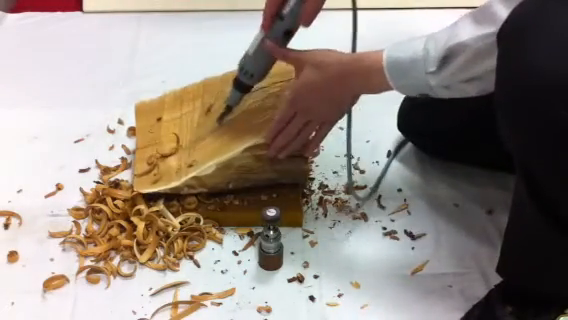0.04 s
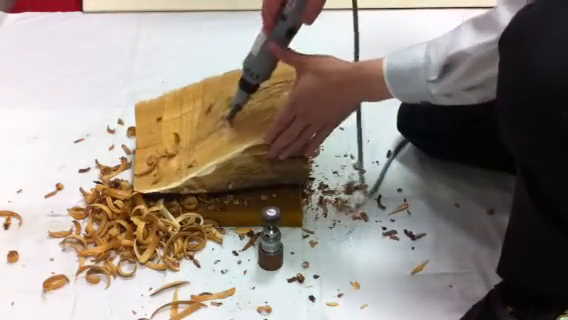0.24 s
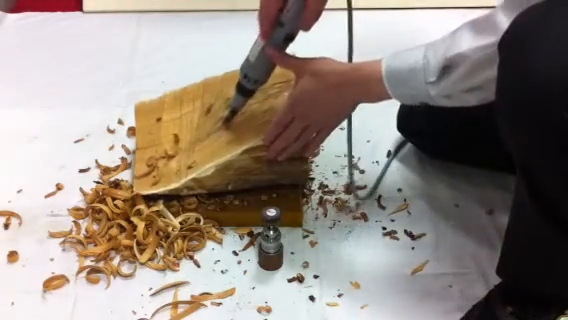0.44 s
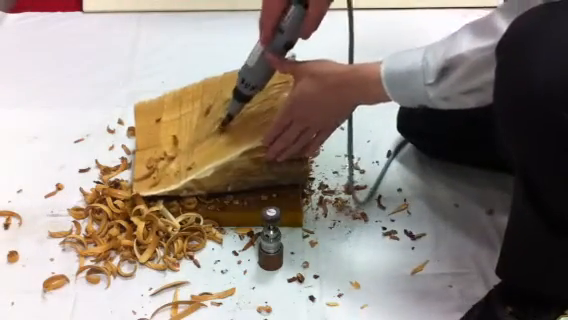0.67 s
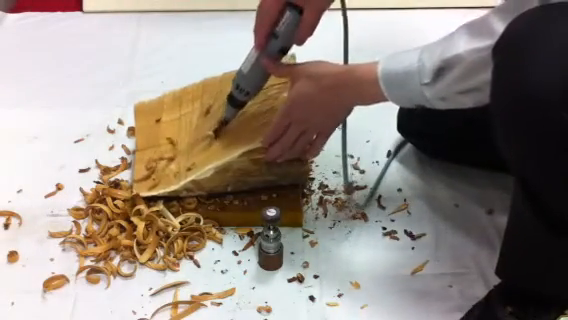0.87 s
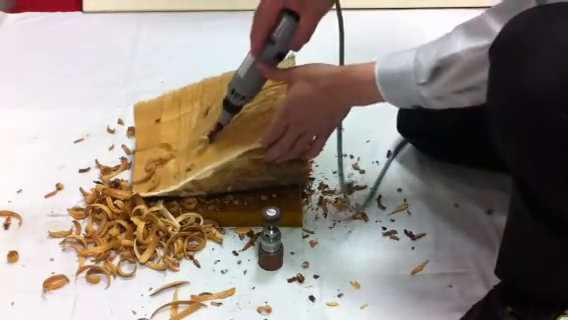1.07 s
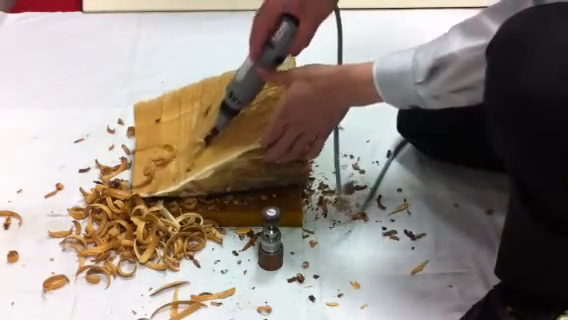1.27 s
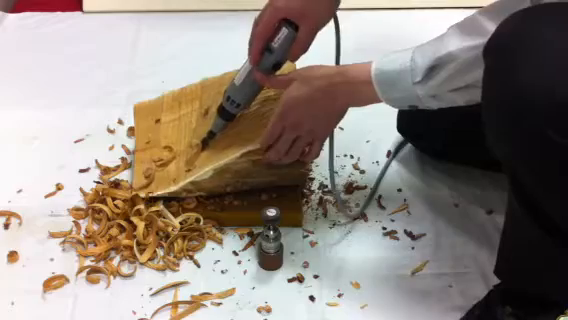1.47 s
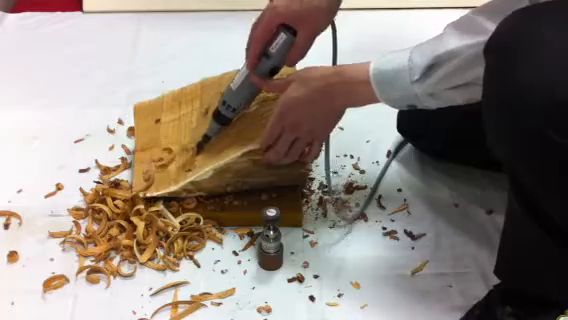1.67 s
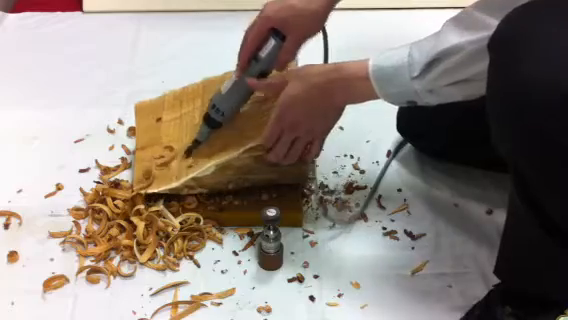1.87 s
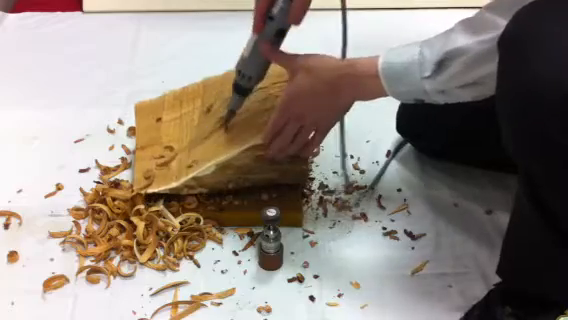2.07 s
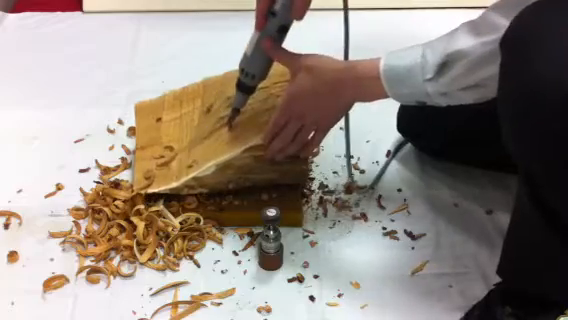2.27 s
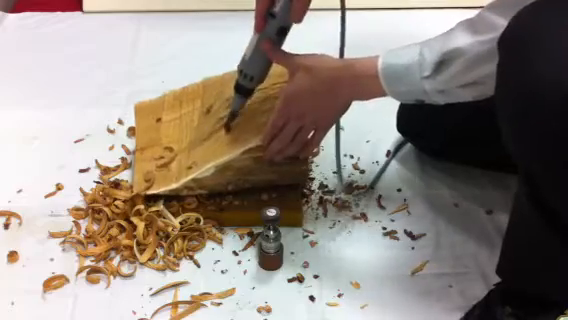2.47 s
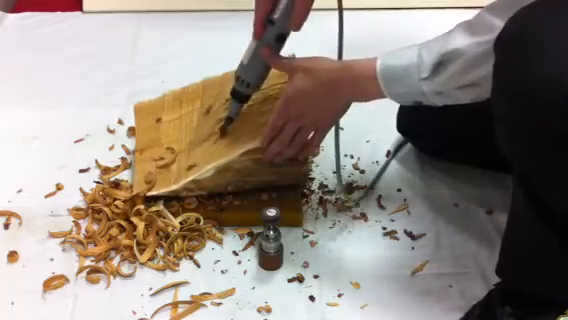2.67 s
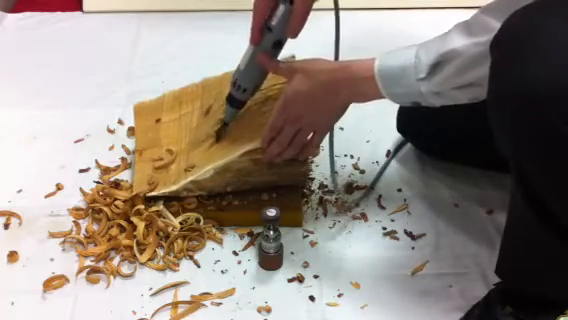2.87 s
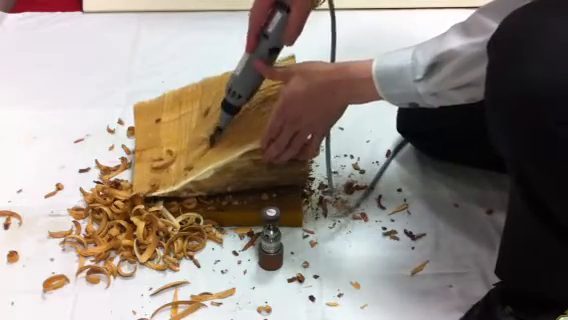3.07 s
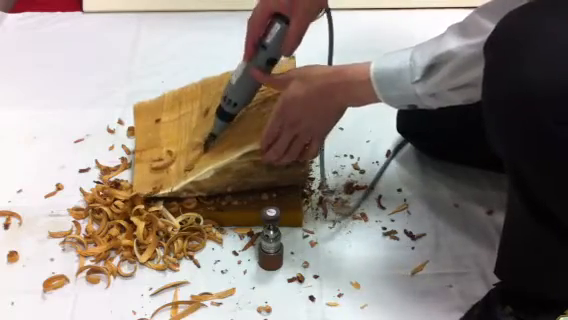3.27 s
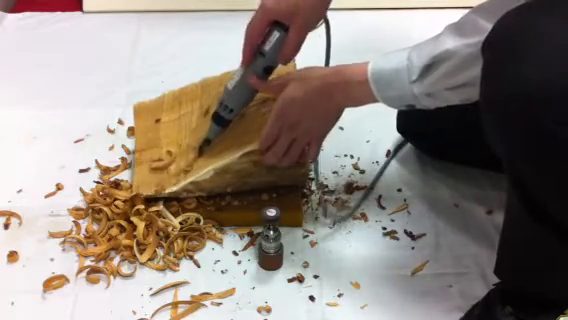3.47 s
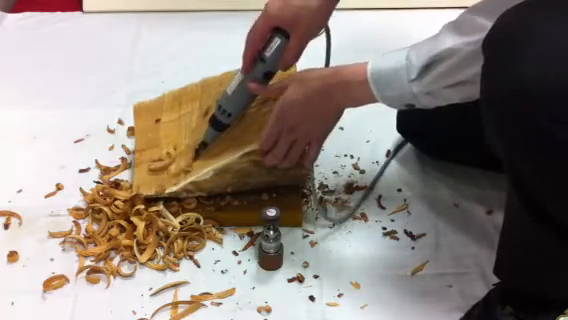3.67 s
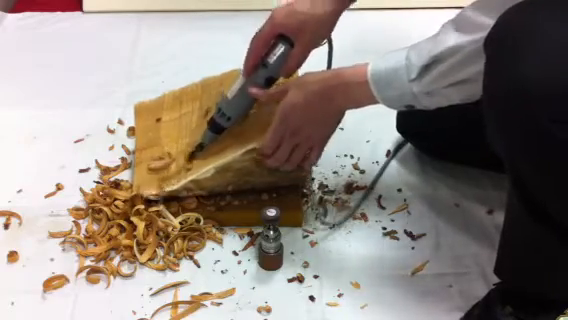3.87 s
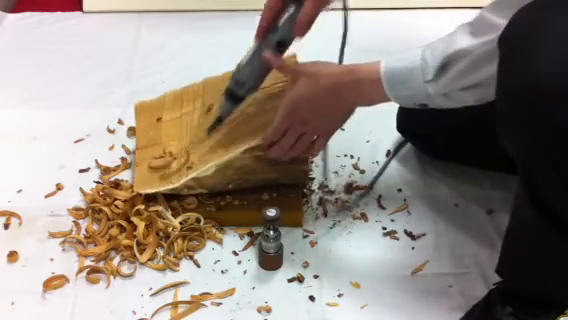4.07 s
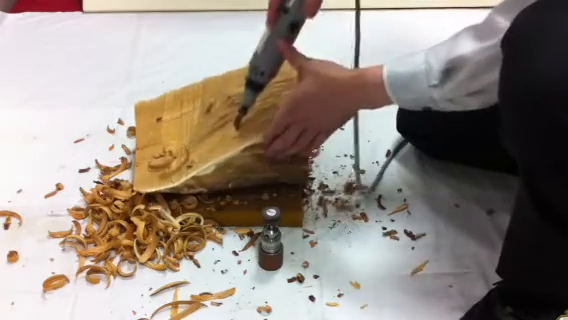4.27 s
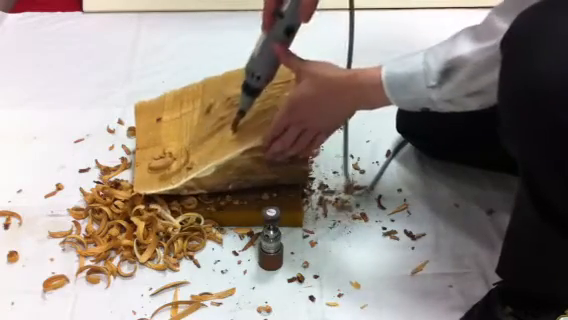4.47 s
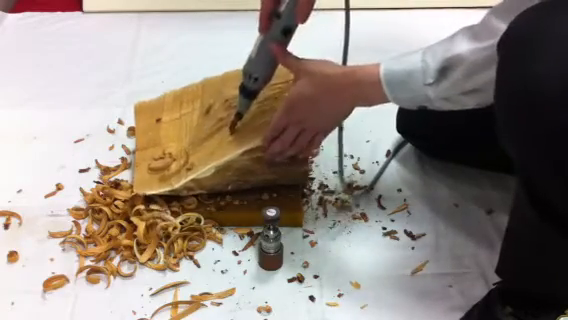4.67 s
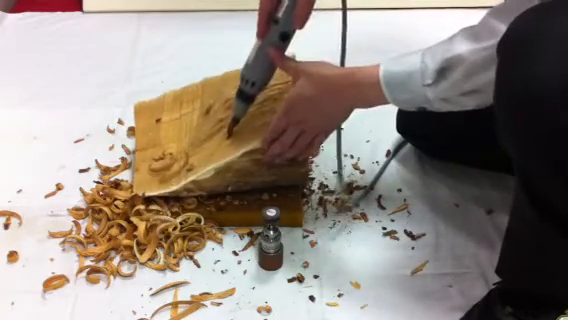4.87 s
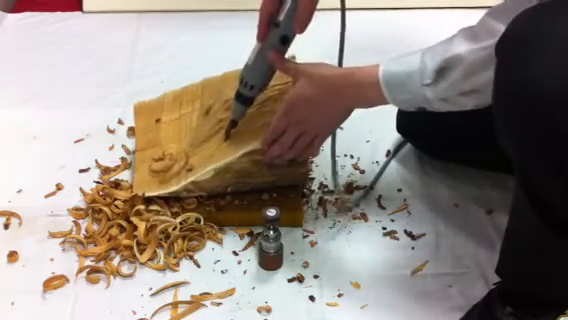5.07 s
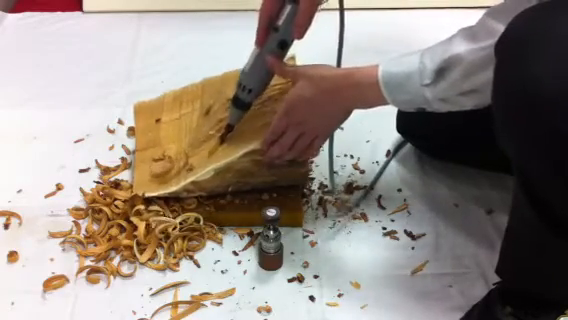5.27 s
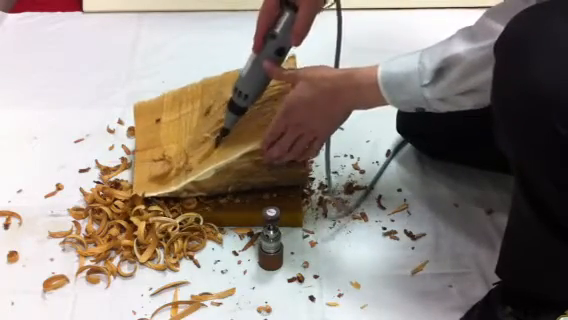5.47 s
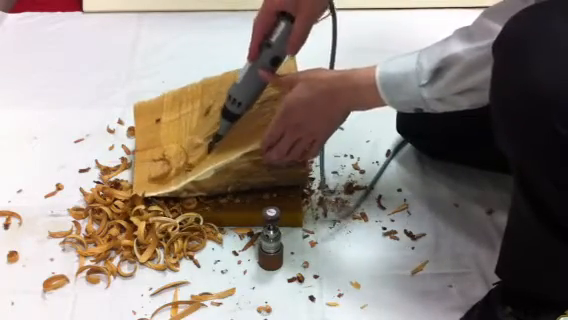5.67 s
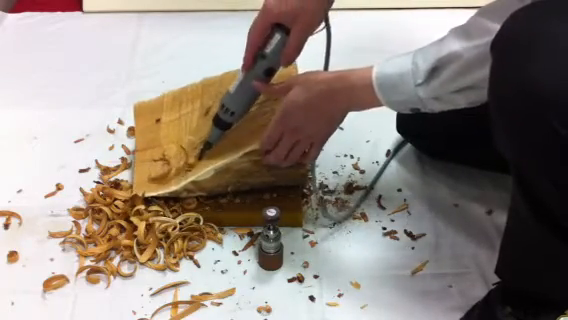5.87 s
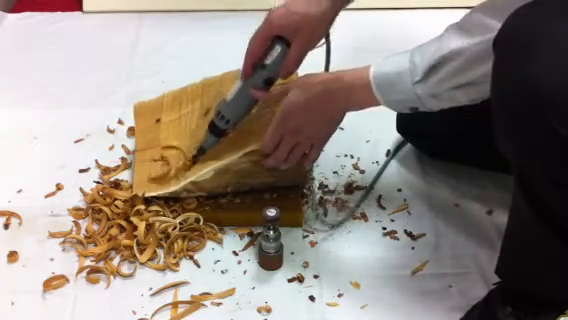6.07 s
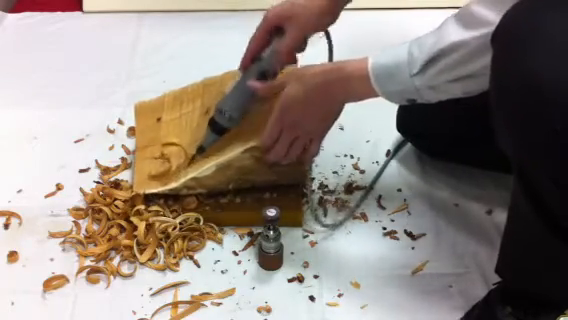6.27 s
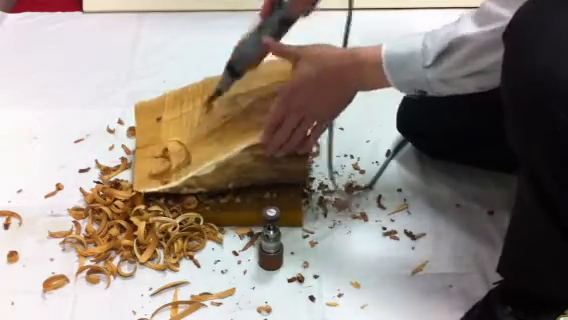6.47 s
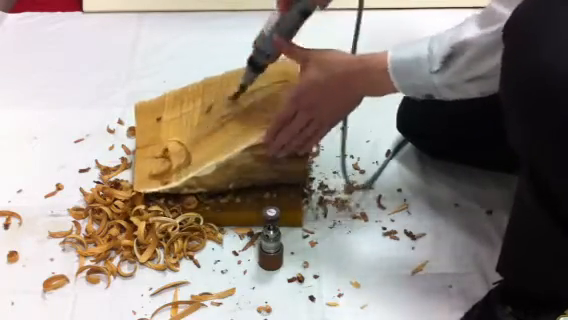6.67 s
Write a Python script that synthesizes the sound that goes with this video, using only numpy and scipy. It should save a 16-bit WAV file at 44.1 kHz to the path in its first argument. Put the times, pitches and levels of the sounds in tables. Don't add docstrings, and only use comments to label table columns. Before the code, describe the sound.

An electric carving tool whines quietly, then buzzes harshly through three long cuts in a wood block, with short free-running pauses between strokes.

```python
import sys
import numpy as np
from scipy import signal
from scipy.fft import rfft, irfft, next_fast_len
from scipy.io import wavfile
from scipy.ndimage import uniform_filter1d, map_coordinates

SR = 44100
rng = np.random.default_rng(int(sys.argv[2]) if len(sys.argv) > 2 else 0)


def invert_db(x):
    u = np.asarray(x, float) / 20
    return 10 ** u


def transcribe(u):
    v = np.clip(np.atleast_2d(u).T, -1, 1)
    q = np.round(v * 32767).astype(np.int16)
    wavfile.write(sys.argv[1], SR, q)


N = 296352
ROCKING, BLOCK_PART, BLADE_PART, SHANK_PART, RATTLE_PART = 1, 2, 3, 4, 5


def clock():
    return np.arange(N) / SR


def unit(x):
    return x / np.sqrt(np.mean(x ** 2) + 1e-20)


def along(points, hz):
    f, v = np.transpose(points)
    return np.interp(np.log(hz + 1), np.log(f + 1), v)


def curve(rows, column=1):
    rows = np.array(rows)
    return np.interp(clock(), rows[:, 0], rows[:, column])


def wobble(rate):
    knots = rng.standard_normal(int(N * rate / SR) + 4)
    return map_coordinates(knots, [np.arange(N) * rate / SR])


def filtered(x, response):
    m = next_fast_len(N + SR // 2)
    return irfft(rfft(x, m) * response(np.fft.rfftfreq(m, 1 / SR)), m)[:N]


def modes(table):
    def response(f):
        total = 0
        for k, (centre, width, db) in enumerate(table):
            total = total + (-1) ** k * invert_db(db) * 1j * f * width / (centre ** 2 - f ** 2 + 1j * f * width)
        return total
    return response


def shaped(table):
    return lambda hz: invert_db(along(table, hz))


def rung(drive, response, gain):
    steady = rfft(drive) * response(np.fft.rfftfreq(N, 1 / SR))
    return filtered(drive * gain, response) * N / np.linalg.norm(steady) / np.sqrt(2)


# time in seconds, turns a second in Hz.
LOADED_SPEED = [
    [(0.0, 172.3)],
    [(0.42, 176.4), (0.5, 172.9), (0.76, 163.4), (0.92, 157.8), (1.05, 155.3), (1.62, 156.8), (1.8, 159.4),
     (1.92, 166.6), (2.0, 173.5)],
    [(2.45, 175.1), (2.53, 172.6), (2.68, 162.9), (2.84, 154), (3.02, 158.5), (3.45, 154.9), (3.75, 157.8),
     (4.02, 164.8), (4.12, 176.5)],
    [(4.52, 176.9), (4.72, 169.3), (4.87, 159.4), (5.05, 154.5), (5.42, 152.4), (5.65, 158.7),
     (5.95, 163.2), (6.18, 159), (6.46, 171.9)],
]
FREE_HZ = [176.8, 177.2, 176.7, 173.4]
RUN_UP_S = .09


def speed():
    rows = []
    for k, loaded in enumerate(LOADED_SPEED):
        if k > 0:
            rows.append((loaded[0][0] - RUN_UP_S, FREE_HZ[k - 1]))
        rows += loaded
        rows.append((loaded[-1][0] + RUN_UP_S, FREE_HZ[k]))
    return uniform_filter1d(curve(rows), size=2600)


def load():
    return np.maximum(max(FREE_HZ) - speed(), 0) / 21.5


BOUNCE_JITTER, BOUNCE_SCATTER = 1.3, .5


def blows(turns, jitter_s, scatter_db, bounce):
    k = np.arange(1, int(turns[-1]))
    luck = rng.standard_normal((len(k), 2))
    at = np.interp(k, turns, np.arange(N))
    miss = np.clip(bounce[np.clip(at.astype(int), 0, N - 1)], 0, 3)
    at = at + jitter_s * (1 + BOUNCE_JITTER * miss) * SR * luck[:, 0]
    size = (1 + miss * (-1) ** k) / np.sqrt(1 + miss ** 2)
    size = size * invert_db(scatter_db * (1 + BOUNCE_SCATTER * miss) * luck[:, 1])
    taps = np.floor(at)[:, None] + np.arange(-7, 9)
    offset = taps - at[:, None]
    shape = np.sinc(offset) * np.cos(offset * np.pi / 16) ** 2
    places = np.clip(taps, 0, N - 1).astype(int)
    return np.bincount(places.ravel(), (size[:, None] * shape).ravel(), N)


# multiple of the shaft rate, level in dB rms.
WHINE_ORDERS = [(1, -93), (2, -84.5), (6, -79.5), (8, -78), (9, -75.5), (12, -77.5), (16, -61.5), (23, -72),
                (24, -56), (25, -73.5), (34, -68), (35, -70), (36, -61.5), (37, -73), (38, -68), (42, -133),
                (48, -62.5), (60, -64), (72, -69)]
TURNED_AWAY = {9: -4, 16: -5.5, 24: 3, 36: -4, 60: -3}
TURN_S = 6.47
# frequency in Hz, level in dB per Hz.
AIR_SPECTRUM = [(20, -28), (60, -20), (160, -5.5), (700, -14), (1100, -10), (1600, -16), (2400, -15.5),
                (3300, -11), (4200, -7), (4700, -6.5), (5700, -17.5), (6200, -22), (7000, -7.5),
                (12000, -8), (16000, -14.5)]


def motor(turns):
    turned = clock() > TURN_S
    lines = 0
    for k, db in WHINE_ORDERS:
        level = invert_db(db + TURNED_AWAY.get(k, 0) * turned + (1.5 + k / 30) * wobble(15))
        lines = lines + level * np.sin(2 * np.pi * k * turns + .018 * k * wobble(120))
    ticks = unit(blows(turns, 1e-5, 1, np.zeros(N)))
    air = unit(filtered(rng.standard_normal(N) + .5 * ticks, shaped(AIR_SPECTRUM)))
    return np.sqrt(2) * invert_db(7) * lines + invert_db(-50 + 1.1 * wobble(7.4)) * air


# time in seconds, force in dB, depth of the edge in dB.
STROKES = [
    [(0.0, -16, -23), (0.012, -29.5, -27)],
    [(0.394, -1.5, -30), (0.46, 0.5, -3.5), (0.54, -8.5, -4), (0.66, -4.5, -1), (0.92, 0, -3),
     (1.35, 0.5, 1.5), (1.78, 0.5, -1.5), (1.9, -2.5, -21), (1.94, -7.5, -46)],
    [(2.426, -0.5, -13), (2.48, -13.5, -2), (2.53, -7, -2), (2.86, -12.5, -3.5), (2.93, -1.5, -1),
     (3.45, 2, -2.5), (3.85, 5, -2.5), (4.02, -0.5, -10), (4.065, -15, -20)],
    [(4.497, -1, -36), (4.58, -7, -4.5), (4.73, -3, 2), (5.0, -3, -1), (5.55, -9, -6.5), (5.62, 0, -3.5),
     (5.95, 2, -15), (6.27, 2, -6.5), (6.4, -6.5, -15.5)],
]
# level in dB, share of force, share of depth,
# gain under load in dB, gain while bouncing in dB.
PARTS = [
    (-39, 0.14, 0.38, 2, 3.5),
    (-29, 0.18, 0.93, 3, -0.26),
    (-45.5, 0.78, 0.15, 19, -0.5),
    (-26.5, 0.8, 0.017, -1.32, 3),
    (-25, 0.74, 0.01, -1.73, 2.7),
]
# time in seconds, force in dB.
STRAYS = [
    (1.938, -8),
    (1.953, -6.5),
    (6.456, -21),
]
# part number, time in seconds, length in seconds, change in
# dB.
PART_SWELLS = [(ROCKING, .47, 0.051, 2.2), (ROCKING, 0.68, 0.073, -20), (ROCKING, 1.9, 0.077, 5.3),
               (ROCKING, 5, 0.08, 6.16), (ROCKING, 2.67, 0.037, -6.5), (ROCKING, 3.1, 0.073, 5.2),
               (ROCKING, 6.36, .1, -12), (BLOCK_PART, 0.463, 0.04, -7), (BLOCK_PART, 2.8, 0.031, -8),
               (BLOCK_PART, 3.3, 0.11, -4), (BLOCK_PART, 4.59, .07, -7), (ROCKING, 5.62, 0.054, -4),
               (BLADE_PART, 0.0, 0.029, 16), (BLADE_PART, 0.56, .08, 2.1), (BLADE_PART, 0.96, 0.14, -3.5),
               (BLADE_PART, 1.34, 0.15, 4), (BLADE_PART, 1.52, .03, -5), (BLADE_PART, 1.654, 0.11, 5),
               (BLADE_PART, 2.6, 0.033, 3.8), (BLADE_PART, 3.6, 0.12, -4), (BLADE_PART, 3.75, 0.19, 2.34),
               (BLADE_PART, 3.92, 0.027, -7), (BLADE_PART, 3.5, 0.14, 3.7), (BLADE_PART, 4.2, 0.033, 5.25),
               (BLADE_PART, 6, 0.11, 2.87), (BLADE_PART, 5.66, 0.048, -8), (BLADE_PART, 6.28, 0.035, 4.2),
               (BLADE_PART, 2.4, 0.055, -4), (SHANK_PART, 4.88, 0.12, -3.5)]
ATTACK_S, RELEASE_DB_PER_S = 0.0038, 690
SEATED_AT = 0.37


def pressure(part):
    t = clock()
    db, by_force, by_depth, load_db, bounce_db = PARTS[part - 1]
    gain = np.zeros(N)
    for rows in STROKES:
        hand_db = by_force * curve(rows, column=1) + by_depth * curve(rows, column=2)
        release_db = RELEASE_DB_PER_S * np.maximum(t - rows[-1][0], 0)
        gain += invert_db(hand_db - release_db) * np.clip((t - rows[0][0]) / ATTACK_S + 1, 0, 1)
    if part > BLOCK_PART:
        for s, force_db in STRAYS:
            gain += invert_db(force_db) * (np.abs(t - s) < .5 / max(FREE_HZ))
    for which, s, length, shift_db in PART_SWELLS:
        if which == part:
            db = db + shift_db * np.exp(-((t - s) / length) ** 4)
    db = db + load_db * np.tanh(load() / SEATED_AT) + bounce_db * grip()[0]
    return invert_db(db + 0.6 * wobble(12)) * gain


# start in seconds, fully developed in seconds, end in seconds,
# shortfall of every second blow from 0 to 1.
BOUNCES = [
    (.49, .56, .61, .25),
    (.62, .68, .97, .06),
    (2.51, 2.68, 2.87, 1),
    (4.71, 4.86, 5.56, 1),
]
LAST_BITE = [.99, 0.94, 0.54, 0.56]
FIRST_BITE, BITE_S = .28, .11
SETTLE_S = .045


def grip():
    bounce = np.zeros(N)
    for start, full, end, depth in BOUNCES:
        bounce += np.interp(clock(), [start, full, end, end + SETTLE_S], [0, depth, depth, 0])
    bite = []
    for rows, last in zip(STROKES[1:], LAST_BITE[1:]):
        start = rows[0][0]
        bite += [(start + BITE_S / 2, FIRST_BITE), (start + 1.3 * BITE_S, 1), (rows[5][0], 1), (rows[-1][0], last)]
    return bounce, curve(bite)


def bursts(train, t60):
    fall = 10 ** (-3 / (t60 * SR))
    return np.abs(signal.lfilter([1], [1, -fall], train)) * rng.standard_normal(N)


def clatter(train, t60, drift, count):
    t = np.arange(int(t60 * SR)) / SR
    build_up = 1 - np.exp(-t / .0003)
    jumbles = rng.standard_normal((count, len(t))) * invert_db(-60 * t / t60) * build_up
    shares = np.array([wobble(drift) for _ in jumbles])
    shares /= np.linalg.norm(shares, axis=0)
    return unit(sum(signal.oaconvolve(train * share, jumble)[:N] for share, jumble in zip(shares, jumbles)))


def small_source(f):
    return (1j * f / 230) ** 5 / (1 + 1j * f / 230) ** 5


def rocking_share(f):
    return 1 / (1 + (f / 420) ** 14)


# frequency in Hz, width in Hz, level in dB.
ROCKING_MODES = [(235, 70, 0), (318, 90, -5), (390, 50, -11)]


def rocking(turns, bounce):
    train = blows(turns, 2e-5, 0.58, 2.45 * bounce)
    response = lambda f: modes(ROCKING_MODES)(f) * small_source(f) * rocking_share(f)
    return rung(train, response, pressure(ROCKING))


# frequency in Hz, width in Hz, level in dB.
BLOCK_MODES = [(447, 54, 7.5), (627, 44.6, 0), (833.5, 24, -4), (1077, 30.5, -1.5), (1320, 490, -16),
               (1996, 260, -13), (2166, 84, -1), (2490, 8.2, -2)]


def block(turns, bounce):
    train = blows(turns, 2e-5, 0.95, bounce)
    return rung(train, lambda f: modes(BLOCK_MODES)(f) * (1 - rocking_share(f)), pressure(BLOCK_PART))


# frequency in Hz, width in Hz, level in dB.
TAP_MODES = [(2200, 500, -5), (3400, 700, -2), (4500, 800, -1), (6600, 500, 1.5), (7300, 400, 0),
             (9000, 600, -38)]


def tap(strike, free):
    return rung(strike, modes(TAP_MODES), invert_db(7) * free * pressure(SHANK_PART))


# frequency in Hz, width in Hz, level in dB.
BLADE_MODES = [(1599, 90, 13), (1715, 130, 7.5)]


def blade(strike, torn):
    return rung(unit(strike) + .38 * torn, modes(BLADE_MODES), pressure(BLADE_PART))


# frequency in Hz, width in Hz, level in dB.
SHANK_MODES = [(2939, 120.7, 6.5), (3188, 220, 6), (3444, 174, 6.5), (4100, 240, -17)]


def shank(strike, torn):
    drive = unit(strike) + 0.5 * clatter(strike, .005, 9, count=3) + 0.55 * torn
    return rung(drive, lambda f: modes(SHANK_MODES)(f) * np.exp(-2j * np.pi * f * .0009), pressure(SHANK_PART))


# frequency in Hz, level in dB per Hz.
HOUSING_SPECTRUM = [(3000, -22), (4100, 0.5), (4850, 0), (5600, -7.5), (6100, -0.5), (6800, -1.5),
                    (7500, -1.5), (8200, -5.5), (9100, 2), (9800, -1), (11500, -3), (13100, -3),
                    (14400, -9), (15700, -13.5)]


def rattle(strike, bite, free, loose):
    drive = .9 * clatter(strike, .014, 10, count=4) + .6 * unit(bursts(strike, .012)) + .7 * loose
    drive = drive / np.sqrt(2 + bite ** 2)
    return rung(drive, shaped(HOUSING_SPECTRUM), (1 - 0.98 * free) * pressure(RATTLE_PART))


# frequency in Hz, level in dB per Hz.
SHAVING_SPECTRUM = [(100, -70), (200, -18), (500, 0), (1000, -3.5), (2000, 6.5), (2650, 3), (3300, 6),
                    (5000, 0), (7000, -3)]


def shaving(strike, bite, loose):
    fibres = 0.43 * clatter(strike, .015, 8, count=3) + bite * unit(bursts(strike, 0.12)) + .5 * loose
    gain = pressure(SHANK_PART) + .5 * pressure(BLOCK_PART)
    return invert_db(-7) * rung(fibres, shaped(SHAVING_SPECTRUM), gain)


def shaft_shake(turns):
    contact = (pressure(ROCKING) + pressure(BLOCK_PART)) / invert_db(-40)
    touch = uniform_filter1d(np.minimum(contact, 1) ** .5, size=1500)
    return invert_db(-39) * touch * (0.11 + np.tanh(load() / 0.94)) * np.sin(2 * np.pi * turns)


# frequency in Hz, width in Hz, level in dB.
SLAP_MODES = [(690, 1650, 21.5), (1094, 80, 27.5), (2220, 200, -10)]


def slap(strike, torn, bounce):
    response = lambda f: modes(SLAP_MODES)(f) * small_source(f)
    return rung(unit(strike) + torn, response, invert_db(-4) * bounce * pressure(BLOCK_PART))


# frequency in Hz, width in Hz, level in dB.
RIM_MODES = [(616, 125, 1), (836, 57, -1)]
# time in seconds, length in seconds, level in dB.
RIM_PASSES = [
    (0.608, 0.094, -4),
    (2.55, 0.062, -5),
    (4.752, .06, -4.5),
    (6.325, 0.088, -5.5),
]


def rim(strike):
    near = sum(invert_db(db) * np.exp(-((clock() - s) / length) ** 2) for s, length, db in RIM_PASSES)
    response = lambda f: modes(RIM_MODES)(f) * (1 - rocking_share(f))
    return rung(strike, response, near * pressure(SHANK_PART))


def gouge(turns):
    bounce, bite = np.clip(grip(), 0, 2)
    strike = blows(turns, 2e-5, 1.4, bounce + .08)
    torn = bite * unit(bursts(strike, 0.048))
    free = np.clip(1 - 2.5 * bite, 0, 1) * (bounce < .2)
    loose = bite ** 1.4 * (.9 - .55 * bounce) * rng.standard_normal(N)
    parts = rocking(turns, bounce) + block(turns, bounce)
    parts += tap(strike, free) + blade(strike, torn) + shank(strike, torn)
    parts += rattle(strike, bite, free, loose) + shaving(strike, bite, loose) + shaft_shake(turns)
    return parts + slap(strike, torn, bounce) + rim(strike)


# time in seconds, length in seconds, level in dB, upper edge in Hz.
FLOOR_SHIFTS = [
    (1.768, 0.029, -48, 150),
    (2.42, 0.011, -62, 123),
    (2.721, 0.013, -46, 149.5),
    (3.84, 0.01, -68, 116),
    (4.9, 0.06, -43, 147.8),
    (5.057, 0.082, -46, 149.9),
    (5.196, 0.077, -48, 149.3),
    (5.3, 0.035, -49, 150),
    (6.056, 0.0008, -17, 2700),
    (2.203, 0.01, -58, 1510),
]


def shifts():
    out = np.zeros(N)
    for s, length, db, edge_hz in FLOOR_SHIFTS:
        band = signal.butter(2, [edge_hz / 12, edge_hz], "band", fs=SR)
        puff = unit(signal.lfilter(*band, rng.standard_normal(N)))
        out += invert_db(db) * np.exp(-((clock() - s) / length) ** 2) * puff
    return out


# frequency in Hz, reverberation time T60 in seconds.
ROOM_DECAY = [(200, .25), (2000, .2), (5000, .09), (10000, .05)]


def room(x):
    hz, t, z = signal.stft(rng.standard_normal(SR // 3), SR, nperseg=256)
    tail = signal.istft(z * invert_db(-60 * t / along(ROOM_DECAY, hz)[:, None]), SR, nperseg=256)[1]
    return signal.fftconvolve(np.pad(x, (200, 0)), tail / np.linalg.norm(tail))[:N]


def scene():
    turns = np.cumsum(speed() + 0.144 * wobble(15)) / SR
    cut = gouge(turns)
    wet = invert_db(-10) * filtered(room(cut), lambda hz: .3 + .7 / (1 + (900 / (hz + 1)) ** 4))
    return (cut + wet + motor(turns) + shifts())[None]


def gapped(x, under_db):
    hz, _, z = signal.stft(x, SR, nperseg=2048)
    band = uniform_filter1d(np.abs(z) ** 2, size=7, axis=0)
    around = uniform_filter1d(np.abs(z) ** 2, size=70, axis=0)
    keep = (band > around * invert_db(2 * under_db)) | (hz < 4400)[:, None]
    return signal.istft(z * keep, SR, nperseg=2048)[1][:N]


def band_limit(x):
    return signal.sosfilt(signal.butter(12, 16460, fs=SR, output="sos"), x)


def record(dry):
    x = dry[0] / (1 + np.abs(dry[0] / .62) ** 4) ** .25
    x = gapped(x, under_db=-6.5)
    x = filtered(x, lambda hz: (hz < 15720) * hz / np.hypot(hz, 110))
    return band_limit(x[None])


dry = scene()
out = record(dry)
transcribe(out)
```